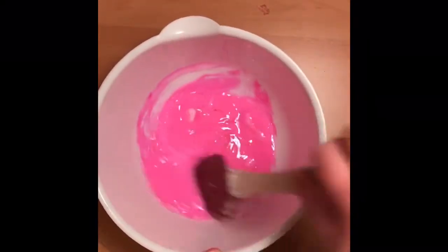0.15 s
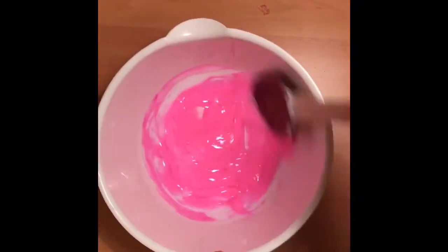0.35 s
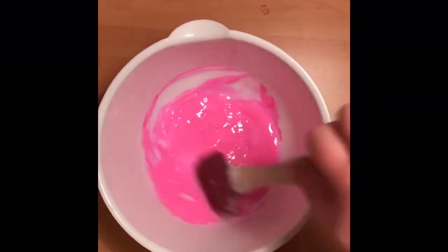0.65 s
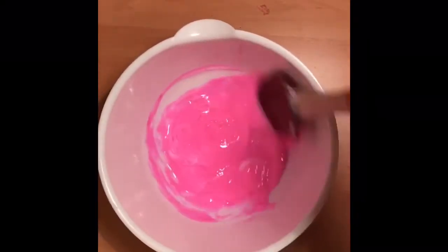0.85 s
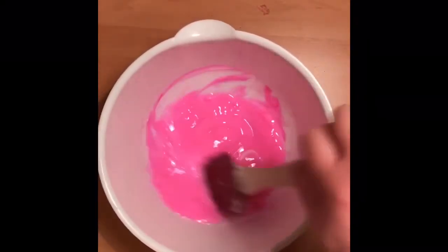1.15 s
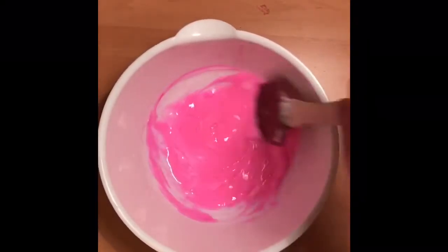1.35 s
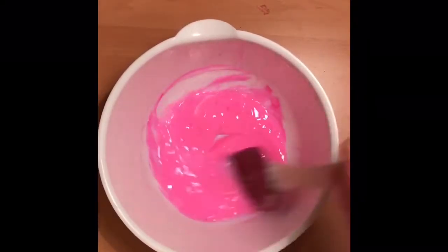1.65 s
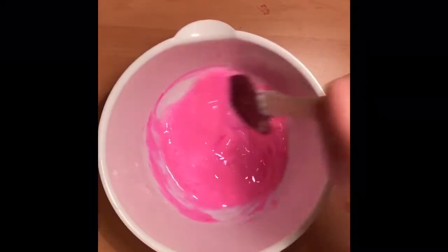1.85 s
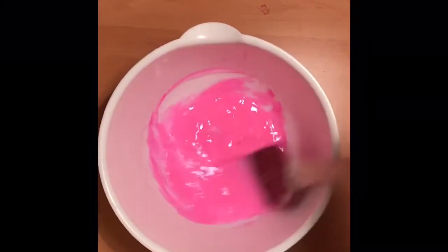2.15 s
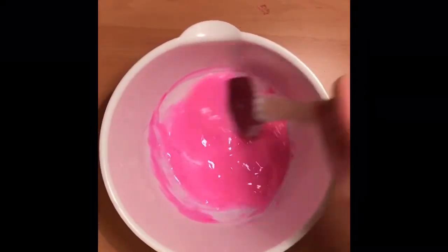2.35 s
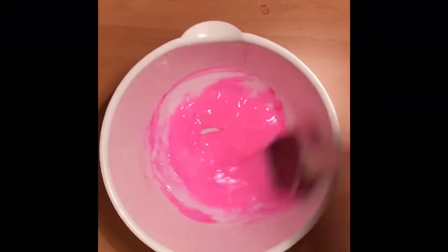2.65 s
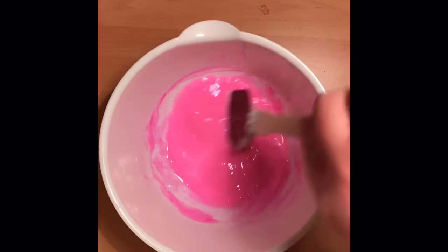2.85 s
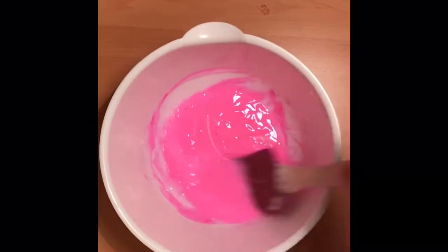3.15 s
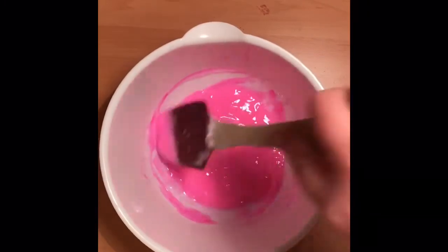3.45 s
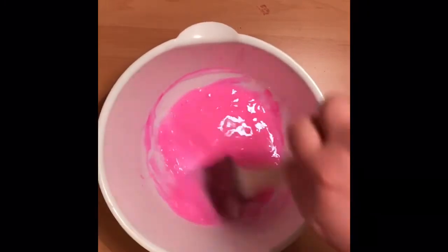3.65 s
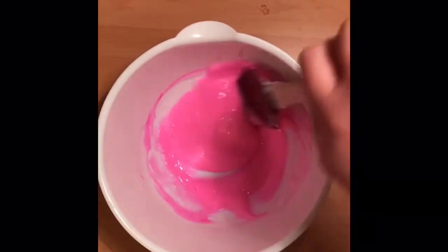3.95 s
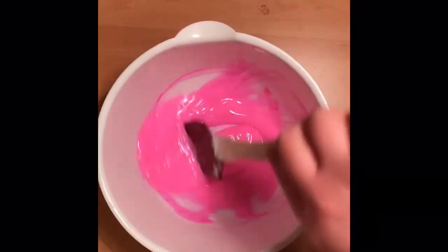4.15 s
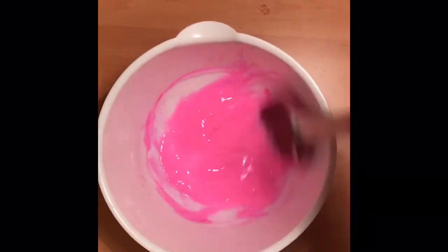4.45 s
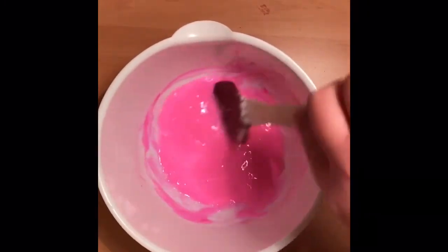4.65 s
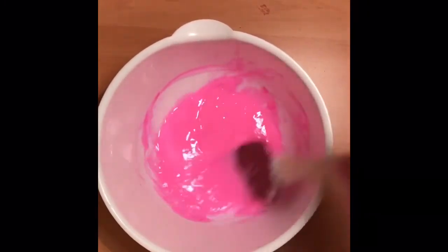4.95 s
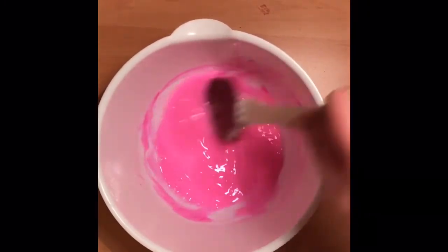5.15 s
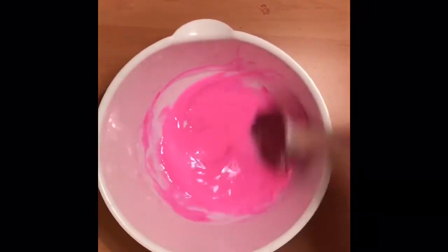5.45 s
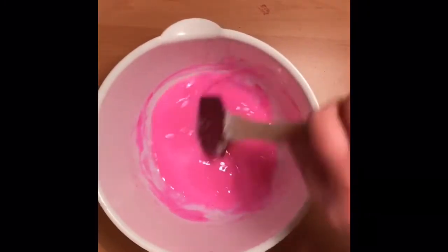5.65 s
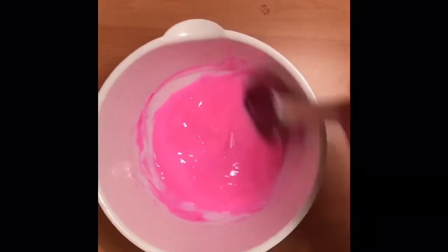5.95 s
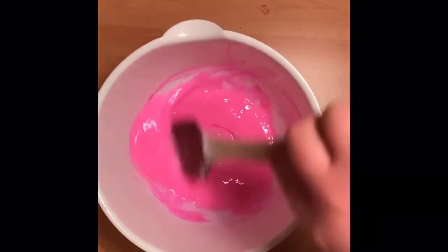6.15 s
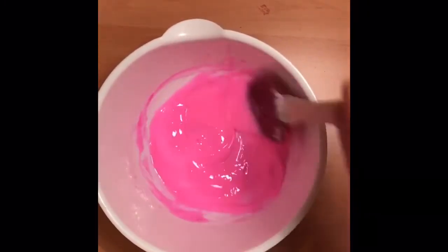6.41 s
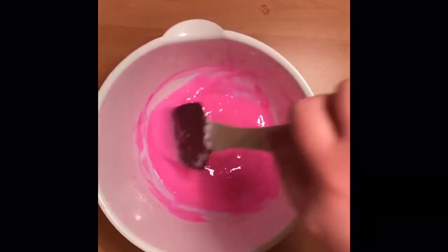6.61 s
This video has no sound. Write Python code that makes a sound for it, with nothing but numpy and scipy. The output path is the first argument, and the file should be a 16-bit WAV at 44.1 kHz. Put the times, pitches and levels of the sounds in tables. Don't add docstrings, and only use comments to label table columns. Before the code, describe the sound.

A spatula stirs thick sticky paste in a plastic bowl, knocking and scraping the walls, with small wet snaps in a quiet room.

```python
import sys
import numpy as np
from scipy import signal
from scipy.fft import rfft, irfft, next_fast_len
from scipy.io import wavfile
from scipy.ndimage import map_coordinates

SR = 44100
rng = np.random.default_rng(int(sys.argv[2]) if len(sys.argv) > 2 else 0)


def transcribe(u):
    v = np.clip(np.atleast_2d(u).T, -1, 1)
    q = np.round(v * 32767).astype(np.int16)
    wavfile.write(sys.argv[1], SR, q)


def boost_factor(decibels):
    exponent = np.asarray(decibels, float) / 20
    return 10 ** exponent


N = 298998

# f/Hz, level per Hz/dB
AIR_SPECTRUM = [(15, -14), (25, -14.5), (75, -7), (140, 2), (199, -6.5), (283, -13.5), (435, -23.5),
                (540, -29.5), (950, -23), (1060, -23.5), (1150, -25), (14400, -36.5), (15700, -38.5)]
# f/Hz, t60/s
ROOM_DECAY = [(200, 0.49), (2000, 0.31), (10000, 0.12)]

# f/Hz, level/dB, t60/s
WALL_MODES = [(1050, -2, .12), (1138, -3, .09), (1290, -3, .13), (1357, -1, .11), (1480, -5, .1),
              (1600, -6, .1), (1800, -6, .07), (1997, -3, .085), (2065, -2, .085), (2250, -3, .07),
              (2430, -3, .06), (2690, -4, .045), (2900, -4, .045), (3150, -6, .03), (3600, -9, .03),
              (4300, -18, .02)]
RIM_MODES = [(399, -10, 0.1), (440, -12.5, 0.064), (540.9, 1, 0.059), (570.5, -2, 0.05), (616, -5.5, 0.079),
             (764, -19, 0.054), (868, -22.5, 0.1)]
BASE_MODES = [(252.8, 1.5, 0.087), (283.7, 5, 0.12), (331.3, -3.5, 0.074)]
TABLE_MODES = [(47.8, -12, 0.19), (86.3, -2, 0.29), (107.1, -4.5, 0.23), (160.7, -7.5, 0.17)]
TABLE_SIGNS = [-1, 1, 1, -1]

# f/Hz, level per Hz/dB
HISS_SPECTRUM = [(700, -23), (1100, 9), (2500, 1), (4000, -9.5), (8000, -7), (15000, -70)]
# f/Hz, level per Hz/dB
TICK_SPECTRUM = [(700, 22.5), (1100, 10.5), (2500, 9.5), (5000, 0), (9000, -25), (15000, -24)]

# t/s, peak level/dB, f/Hz, life/cycles
POPS = [(.8868, -48.5, 2730, 16), (1.203, -52, 8230, 130), (1.52, -38.5, 6650, 1.6),
        (1.5285, -45.5, 8200, 29), (1.568, -50, 3140, 21), (2.4988, -58, 1720, 25),
        (2.936, -42.5, 6860, 2.4), (4.0955, -56, 4060, 5.2), (4.102, -45.5, 4900, 27),
        (5.2366, -40, 2850, 12), (5.2364, -48.5, 4840, 27)]
# t/s, peak level/dB, f/Hz, life/cycles
TEARS = [(0.519, -51, 2780, 8.8), (1.1222, -56.5, 2140, 8.4), (1.2026, -51, 3300, 3.2),
         (1.5677, -52.5, 6500, 7.3), (1.5952, -45, 2530, 32), (1.5948, -44.5, 5820, 43),
         (1.6, -47, 8250, 7.8), (2.0001, -58.5, 2320, 12), (2.426, -53.5, 2350, 11),
         (2.432, -49, 4700, 6.2), (2.725, -53.5, 2330, 2.8), (3.5195, -57.5, 3440, 25),
         (3.5207, -62, 2400, 14), (4.196, -57, 1250, 6.8), (4.102, -47, 3930, 38),
         (4.115, -52.5, 2160, 5.7), (5.175, -58.5, 2250, 12)]

# t/s, drag level/dB
DRAG = [(0.0, -56), (0.24, -62.5), (0.34, -61), (0.85, -67), (0.94, -64.5), (1.87, -65.5), (2.32, -57),
        (2.55, -61.5), (3.59, -69), (4.51, -62.5), (4.95, -71), (5.23, -64), (5.34, -64.5), (5.59, -65.5),
        (5.76, -64), (5.95, -67.5), (6.18, -59.5), (6.78, -72.5)]
# middle t/s, half length/s, base level/dB, rim over base/dB, grit over base/dB
LOW_SCRAPES = [(0.21, 0.036, -61.5, -2, -14), (0.357, 0.042, -58, -18, -7), (0.63, 0.05, -72, 0.5, -12),
               (1.12, 0.093, -70, -3, -10.5), (1.89, 0.025, -71, 1.5, -15), (2.1, 0.0096, -64.5, 6, -19),
               (2.578, 0.01, -70.5, 15, 5.5), (2.736, 0.0091, -56, 6.5, -11), (3.569, 0.023, -53, -2, -14),
               (3.615, 0.032, -49, -13.5, -26), (3.77, 0.22, -83, 1, 4), (3.927, 0.023, -74, -2, -10),
               (4.709, 0.038, -59, -4, -24), (5.18, 0.05, -62, -10.5, -31), (5.427, 0.036, -75.5, -4, 3.5),
               (6.535, 0.053, -59.5, -23, -33)]
HIGH_SCRAPES = [(0.409, 0.035, -50, -5.5, -15), (0.885, 0.037, -45.5, -7, -21),
                (1.319, 0.023, -85.5, 1.1, 23), (1.391, 0.03, -71, 4, 1), (2.287, 0.027, -51.5, -20, -23),
                (2.486, 0.023, -67.5, 3, -7.5), (3.575, 0.056, -86, 1.1, 15.5),
                (4.226, 0.022, -50, 0.5, -33), (5.27, 0.034, -58.5, -7.5, -31),
                (5.33, 0.0063, -72.5, 18, 12.5), (5.668, 0.038, -48, -1.9, -26.5),
                (6.266, 0.011, -53, -0.5, -19), (6.754, 0.013, -46, -12, -29)]
WIPES = [
    (1.314, 0.055, -91, 4.8, 13),
    (3.58, 0.06, -92, 1.1, 8),
]

# t/s, table level/dB, base level/dB, rim level/dB
SHOVES = [
    (2.54, -52, -57, -40),
    (3.157, -46, -56, -56),
    (3.546, -25, -49.5, -62),
    (3.574, -31, -43.5, -70),
    (3.909, -34.5, -51, -64),
    (3.942, -45, -58.5, -75),
    (4.219, -41, -64, -52),
    (4.69, -42.5, -47.5, -60),
    (6.733, -26.5, -50.5, -50),
    (6.766, -40, -56, -53),
]
# t/s, rim level/dB, bare wall over rim/dB, weight on the table/dB, tick over wall/dB
KNOCKS = [(0.32, -37.5, 4.5, -1.5, -29), (0.8355, -42, 8.5, 2, -19), (1.3437, -43.5, 5.5, 5, -16),
          (2.221, -37, 6.5, -3, -20), (2.5521, -46, -0.5, -17, -25), (2.7327, -45, -2.3, 5.5, -14.5),
          (4.1935, -43.5, -20, 0.5, -35), (4.4773, -46, 6, 0.5, -28), (4.8994, -45.5, -8, -11.5, -8.5),
          (5.3169, -45.5, -6, -19, -9), (5.4674, -38, 2.3, -3, -30), (5.939, -42, 3.5, 1, -24),
          (6.251, -56.5, 7, 4.5, -25), (6.4133, -47.5, 5, -2.5, -18.5)]


def unit(x):
    return x / np.sqrt(np.mean(x ** 2) + 1e-20)


def along(points, hz):
    f, value = np.transpose(points)
    return np.interp(np.log(hz + 1), np.log(f + 1), value)


def filtered(x, response):
    size = next_fast_len(len(x) + 8192)
    hz = np.fft.rfftfreq(size, 1 / SR)
    return irfft(rfft(x, size) * response(hz), size)[:len(x)]


def coloured(n, spectrum):
    return unit(filtered(rng.standard_normal(n), lambda hz: boost_factor(along(spectrum, hz))))


def decay(t, t60):
    return boost_factor(-60 * t / t60)


def onset(t, rise):
    return 1 - np.exp(-t / rise)


def add(track, s, sound):
    track[round(s * SR):][:len(sound)] += sound


def stick_slip(rate, depth_db):
    knots = rng.standard_normal(round(N / SR * 400))
    strength_db = depth_db * map_coordinates(knots, [np.arange(N) * rate / SR])
    return boost_factor(strength_db) * rng.standard_normal(N)


def grit(hz):
    chance, size = rng.random(N), rng.standard_normal(N)
    slips = (chance < 2500 / SR) * size + 0.08 * size
    width = hz / 1.16
    return filtered(slips, lambda f: (1j * f * width / (hz * hz - f * f + 1j * f * width)) ** 2)


def driven(force, modes, damping):
    def response(f):
        total = 0
        for k, (centre, db, t60) in enumerate(modes):
            loss = 1j * f * damping * np.log(1000) / np.pi / t60
            total = total + (-1) ** k * boost_factor(db) * loss / (centre * centre - f * f + loss)
        return total / (1 + 1j * f / (2.86 * modes[-1][0])) ** 2
    return unit(filtered(force, response))


def struck(modes, lag, rise, uneven_db, sign=1, wander=0, detune=0.021):
    hz, db, t60 = np.transpose(modes)[:, :, None]
    luck = rng.standard_normal((3, len(modes), 1))
    t = np.clip(np.arange(SR // 3) / SR - lag, 0, None)
    fade = boost_factor(db + uneven_db * luck[0]) * decay(t, t60 * np.exp(0.12 * luck[2]))
    drift = 0
    if wander:
        drift = wander * np.cumsum(rng.standard_normal((len(modes), len(t))), axis=1)
    tones = np.sin(2 * np.pi * hz * (1 + detune * luck[1]) * t + drift)
    ring = np.reshape(sign, (-1, 1)) * fade * tones
    blow = ring.sum(axis=0) * onset(t, rise)
    return blow / np.abs(blow).max()


def quiet_air():
    return boost_factor(-66.5) * coloured(N, AIR_SPECTRUM)


def room(x):
    hz, t, z = signal.stft(rng.standard_normal(SR // 2), SR, nperseg=256)
    t60 = along(ROOM_DECAY, hz)[:, None]
    tail = signal.istft(z * decay(t, t60), SR, nperseg=256)[1]
    return signal.fftconvolve(np.pad(x, (220, 0)), tail / np.linalg.norm(tail))[:N]


def snap(hz, cycles, crackle_db, crackle_t60):
    t = np.arange(SR // 8) / SR
    ping = np.sin(2 * np.pi * hz * t) * decay(t, cycles / hz) * onset(t, 0.57 / hz)
    film = [(hz / 13.0, -30), (hz / 1.1, -3), (hz, 0), (hz * 1.2, -4), (hz * 2.7, -17)]
    crackle = coloured(len(t), film) * decay(t, crackle_t60) * onset(t, 0.0036)
    return ping / ping.max() + boost_factor(crackle_db) * crackle


def air_pockets():
    out = np.zeros(N + SR)
    for s, db, hz, cycles in POPS:
        add(out, s, boost_factor(db) * snap(hz, cycles, crackle_db=-15.5, crackle_t60=0.059))
    for s, db, hz, cycles in TEARS:
        add(out, s, boost_factor(db) * snap(hz, cycles, crackle_db=-6, crackle_t60=0.05))
    return out[:N]


def shoves():
    out = np.zeros(N + SR)
    for s, table_db, base_db, rim_db in SHOVES:
        add(out, s, boost_factor(rim_db - 0.5) * struck(RIM_MODES, lag=0.0022, rise=0.002, uneven_db=1.5))
        add(out, s, boost_factor(base_db + 4) * struck(BASE_MODES, lag=0.001, rise=0.005, uneven_db=3))
        table = struck(TABLE_MODES, lag=0.0019, rise=0.0041, uneven_db=4.0, sign=-1)
        add(out, s, boost_factor(table_db - 5.0) * table)
    return out[:N]


def knocks():
    out, t = np.zeros(N + SR), np.arange(SR // 4) / SR

    def soften(hz):
        bend = hz / 4120
        return 1 / (1 + 1j * bend * 1.28 - bend ** 2) ** 2

    for s, rim_db, bare_db, weight_db, tick_db in KNOCKS:
        wall_db, table_db = rim_db + bare_db, rim_db + weight_db
        base_db = -46 + 0.2 * (rim_db + 36) + 0.26 * weight_db
        tick = coloured(len(t), TICK_SPECTRUM) * decay(t, 0.021)
        rattle = driven(rng.standard_normal(len(t)) ** 3, WALL_MODES, damping=3.5)
        rattle = rattle * decay(t, 0.13) * onset(t, 0.00044)
        wall = struck(WALL_MODES, lag=0.0003, rise=0.0008, uneven_db=2, wander=0.08, detune=0.008)
        rim = struck(RIM_MODES, lag=0.0012, rise=0.003, uneven_db=1.5)
        base = struck(BASE_MODES, lag=0.0042, rise=0.0022, uneven_db=4.0)
        table = struck(TABLE_MODES, lag=0.0085, rise=0.004, uneven_db=1.2, sign=TABLE_SIGNS)
        add(out, s, boost_factor(wall_db + tick_db + 16.5) * tick)
        add(out, s, boost_factor(wall_db - 21.5) * rattle)
        add(out, s, boost_factor(wall_db - 2.5) * filtered(wall, soften))
        add(out, s, boost_factor(rim_db + 4.5) * rim)
        add(out, s, boost_factor(base_db + 7.0) * base)
        add(out, s, boost_factor(table_db + 9) * table)
    return out[:N]


def scrapes(base, rim, wet):
    out, t = np.zeros(N), np.arange(N) / SR
    for rows, grit_hz in ((LOW_SCRAPES, 1370), (HIGH_SCRAPES, 2250), (WIPES, 7000)):
        rasp = unit(grit(grit_hz)) + 0.1 * wet
        for middle, half, base_db, rim_db, grit_db in rows:
            start = max(round((middle - 3 * half) * SR), 0)
            near = slice(start, round((middle + 3 * half) * SR))
            swell = np.exp(-np.abs((t[near] - middle) / half) ** 2.46)
            for over_db, source in ((0, base), (rim_db, rim), (grit_db, rasp)):
                part = source[near]
                loudness = np.sqrt(np.average(part ** 2, weights=swell))
                out[near] += boost_factor(base_db + over_db) * swell * part / loudness
    return out


def stirring():
    t = np.arange(N) / SR
    drag_db = np.interp(t, *np.transpose(DRAG))
    drag_db = drag_db - drag_db.mean()
    rumble = boost_factor(-59.5 + 0.69 * drag_db)
    hum = boost_factor(-62 + 1.04 * drag_db)
    hiss = boost_factor(-85 + drag_db)
    for s, rim_db, bare_db, *_ in KNOCKS:
        since = np.clip(t - s, 0, None)
        hiss = hiss + boost_factor(rim_db + bare_db - 38) * decay(since, 0.38) * onset(since, 0.027)
    table = driven(stick_slip(rate=14, depth_db=0.0), TABLE_MODES, damping=3.44)
    base = driven(stick_slip(rate=30, depth_db=1.5), BASE_MODES, damping=1.45)
    rim = driven(stick_slip(rate=40, depth_db=4.0), RIM_MODES, damping=1.39)
    wall = driven(stick_slip(rate=69, depth_db=9.0), WALL_MODES, damping=12.0)
    film = stick_slip(rate=39, depth_db=6.0)
    wet = unit(filtered(film, lambda hz: boost_factor(along(HISS_SPECTRUM, hz))))
    bowl = 0.45 * base + 0.33 * rim
    paste = 0.69 * wet + 0.5 * wall
    return rumble * table + hum * bowl + hiss * paste + scrapes(base, rim, wet)


def scene():
    blows, snaps = knocks() + shoves(), air_pockets()
    answer = room(boost_factor(-15.5) * blows + boost_factor(-15) * snaps)
    return (quiet_air() + answer + snaps + blows + stirring())[None]


def top_cut(x):
    return signal.sosfilt(signal.butter(12, 15810, fs=SR, output="sos"), x)


def record(dry):
    thin = filtered(dry[0], lambda hz: (hz < 15800) / (1 + (38 / (hz + 1)) ** 8))[None]
    return top_cut(thin)


dry = scene()
out = record(dry)
transcribe(out)
```